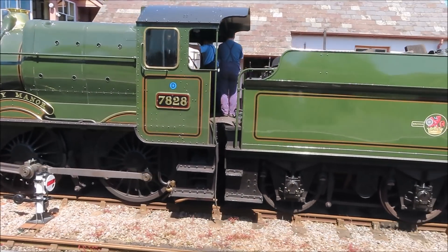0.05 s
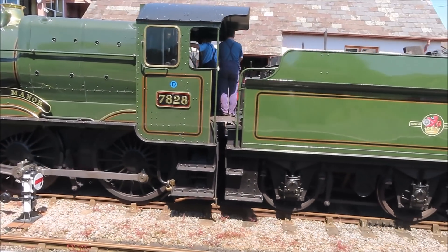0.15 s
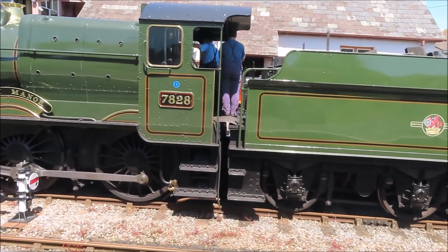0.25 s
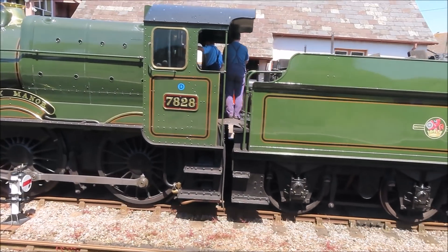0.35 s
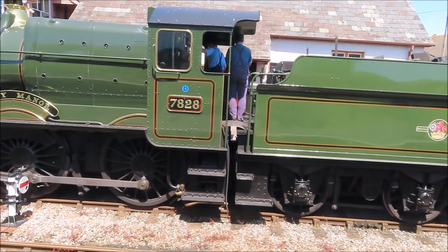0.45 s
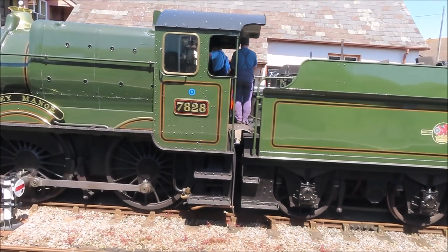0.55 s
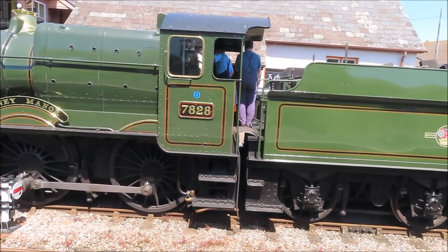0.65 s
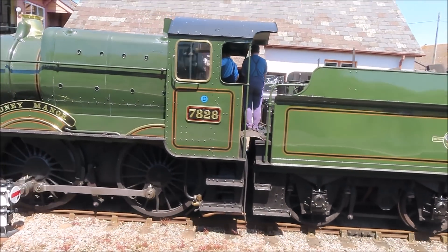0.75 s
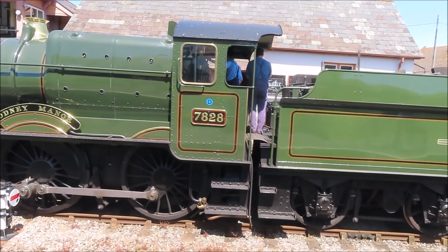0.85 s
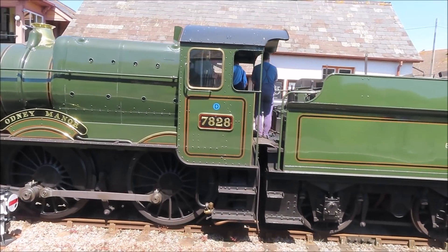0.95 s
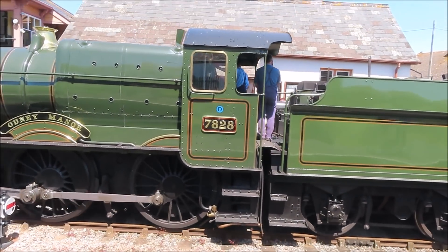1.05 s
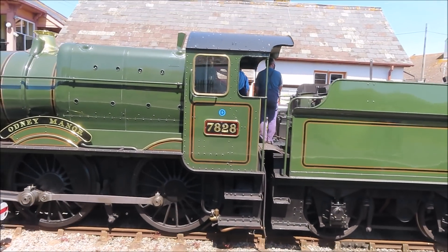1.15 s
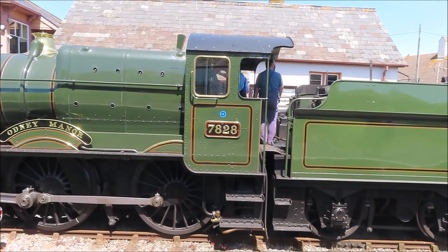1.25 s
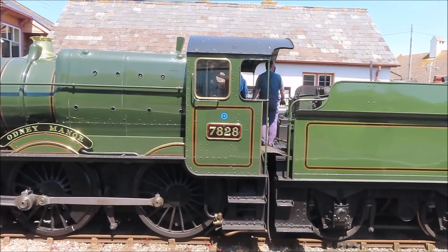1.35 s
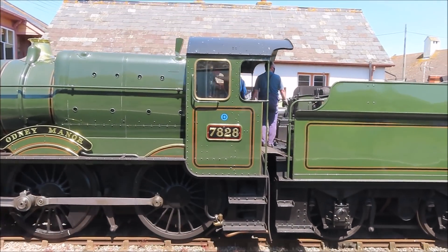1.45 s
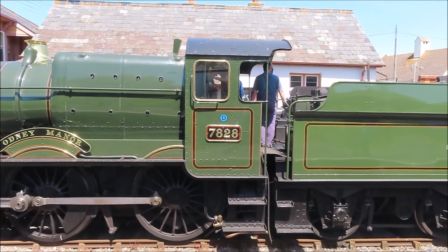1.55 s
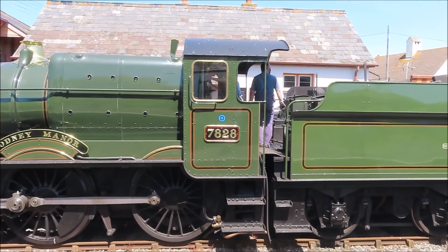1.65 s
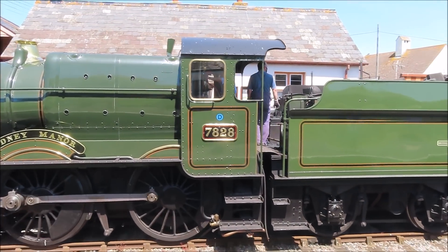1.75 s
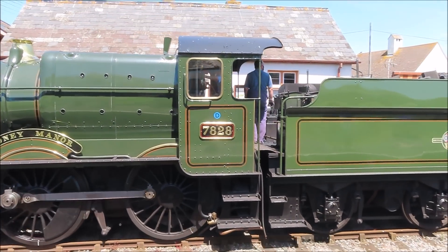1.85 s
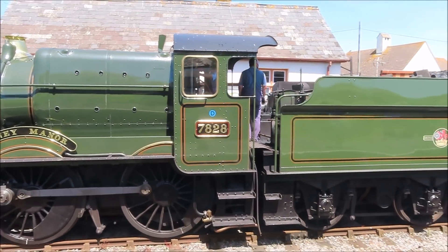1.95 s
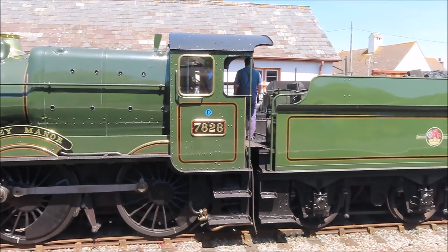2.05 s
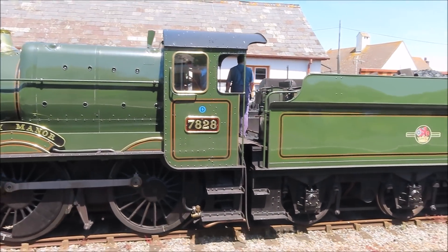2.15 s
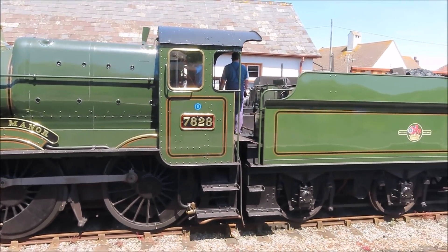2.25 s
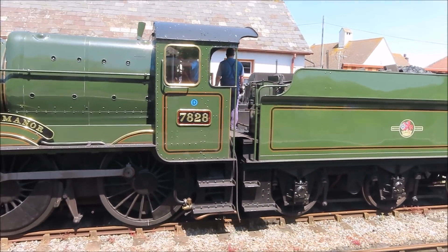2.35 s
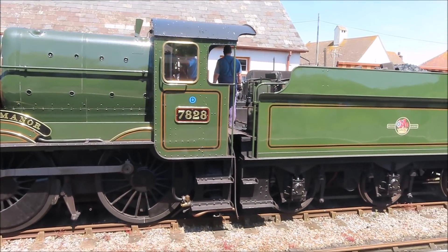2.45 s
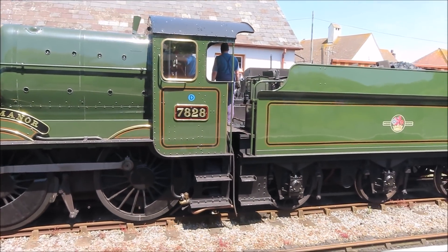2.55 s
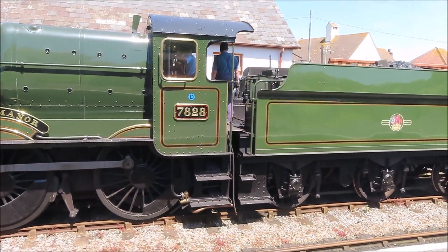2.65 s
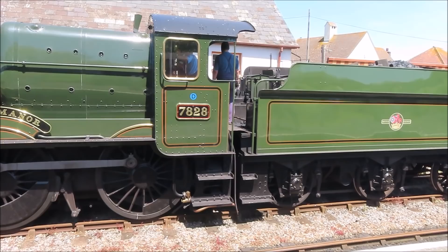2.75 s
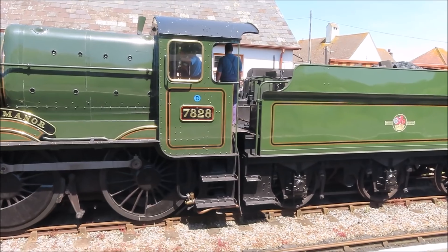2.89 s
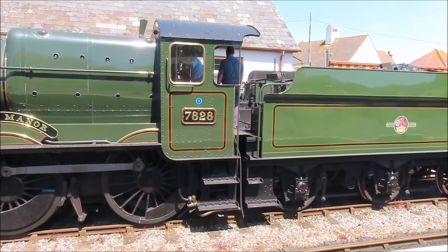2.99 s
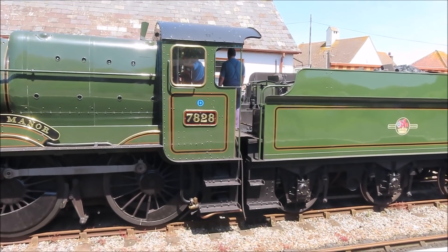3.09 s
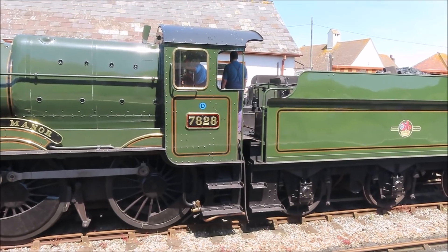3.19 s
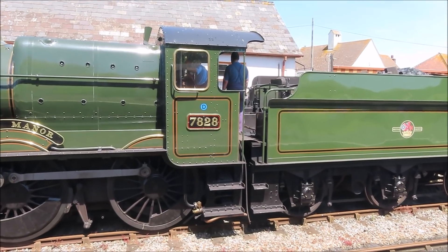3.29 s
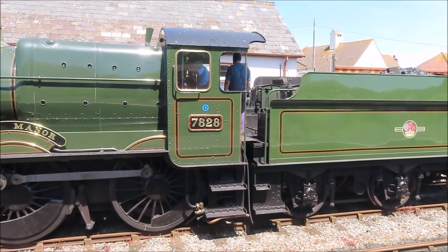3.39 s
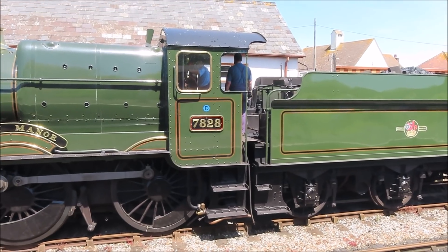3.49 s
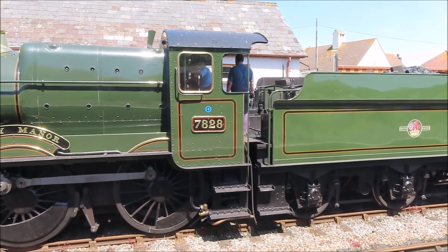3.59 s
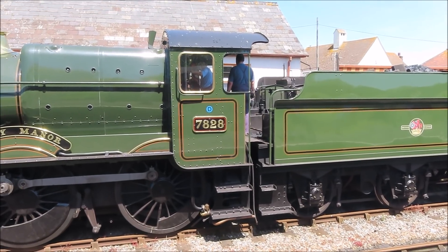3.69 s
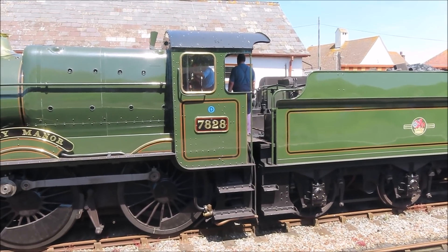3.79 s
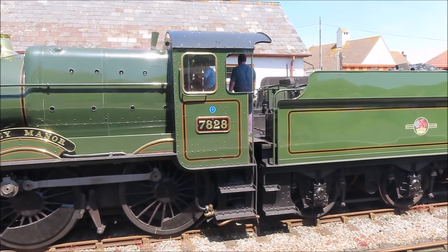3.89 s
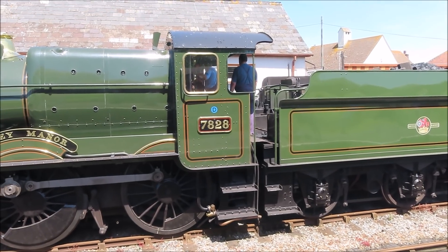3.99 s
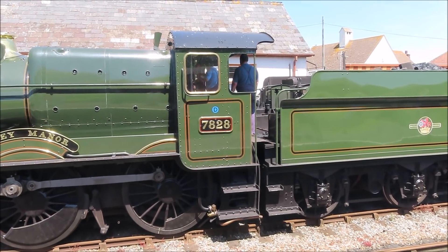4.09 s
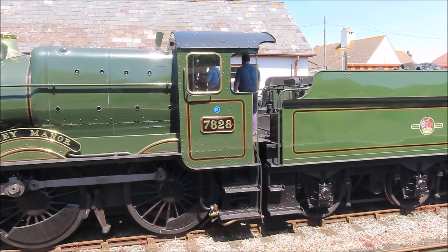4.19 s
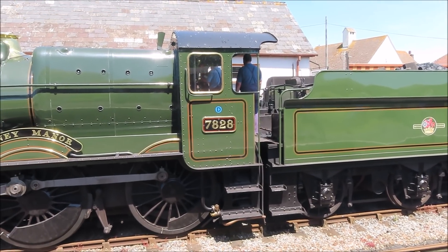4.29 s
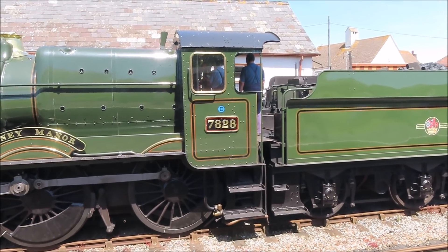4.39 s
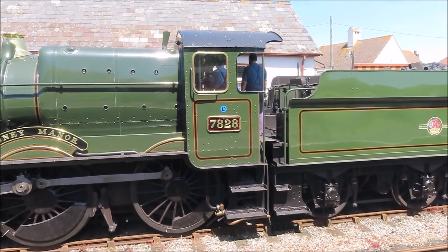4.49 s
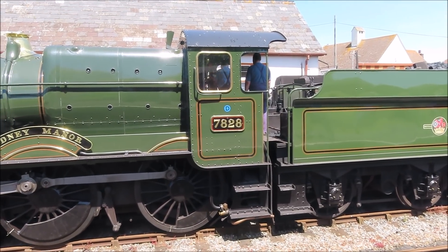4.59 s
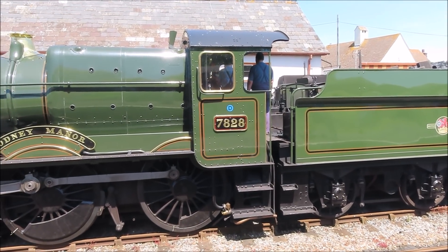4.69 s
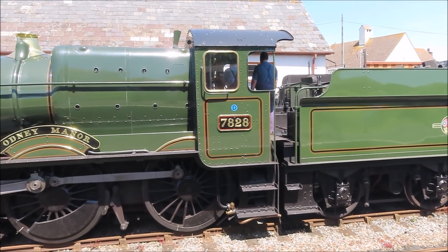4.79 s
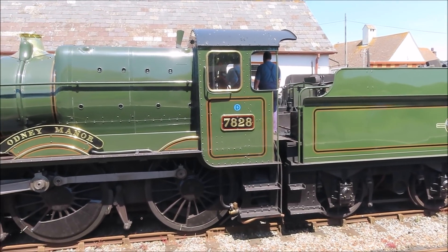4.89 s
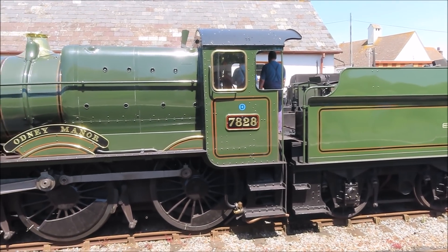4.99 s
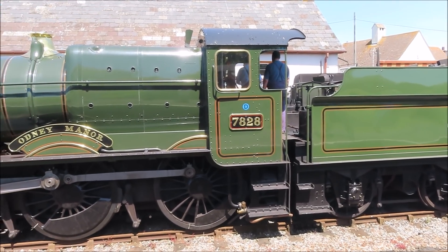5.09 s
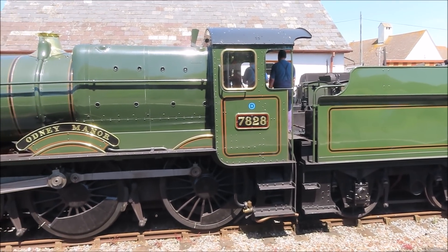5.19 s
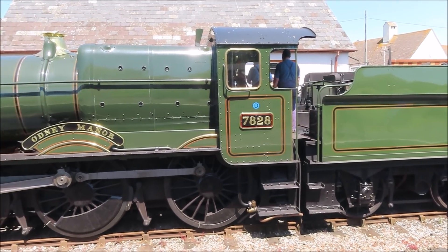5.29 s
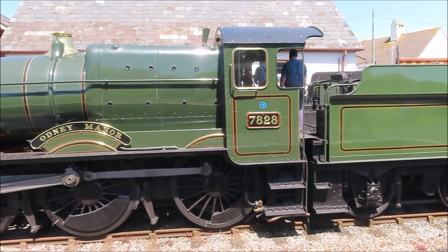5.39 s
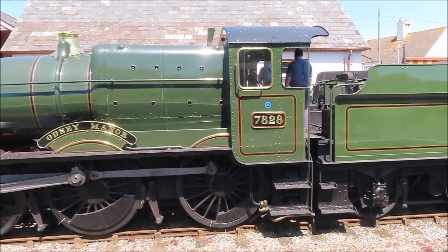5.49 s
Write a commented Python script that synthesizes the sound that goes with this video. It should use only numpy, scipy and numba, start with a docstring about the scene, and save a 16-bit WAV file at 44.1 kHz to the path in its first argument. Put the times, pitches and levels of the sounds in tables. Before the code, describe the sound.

Close outdoor stereo sound of a steam locomotive braking to a stand. Steady, slightly left-leaning steam hiss runs throughout over low rolling rumble, with a dry brake scrape in the first half second. Wheels thump over rail joints, strongest at 0.7 s, then duller around 1.2, 1.4, 1.75 and 2.05. From 1.15 s the brakes give tiny, thin, irregular chirps near 4.7 kHz, growing louder and denser. At 2.3 s couplings slam in a quick rattling iron clank with a short squeak, thud and clattering tail. Low groans and a nasal metallic moan follow. From about 2.97 to 3.3 s a pure, piercing shriek surges, rises slightly and breaks off. A soft low shudder marks the stop near 3.5 s. The loud moments briefly push the hiss down; afterwards it creeps back, fuller and harsher, over a faint deep drone from about 3.9 s until the end.

```python
"""Beside the track at a station, a few metres from a steam locomotive that brakes to a stand, hissing all the while.
Shaped noise makes the steam, the rolling and the shaking of the track; struck modes make the rail joints and couplings.
Friction tones make the brake shoes, which chirp near 4.7 kHz and then shriek, and the rigging, which groans and moans.
The stereo recorder's gain control ducks under loud sound, holds, and lets the hiss creep back."""
import sys
import numpy as np
from scipy import signal
from scipy.fft import rfft, irfft
from scipy.io import wavfile
from scipy.ndimage import uniform_filter1d
from numba import njit

SR = 44100
rng = np.random.default_rng(int(sys.argv[2]) if len(sys.argv) > 2 else 0)


def store_pcm(level_fs):
    """Save levels as 16-bit WAV."""
    pcm = np.round(np.clip(level_fs, -1, 1) * 32767).astype(np.int16)
    wavfile.write(sys.argv[1], SR, np.atleast_2d(pcm).T)


N = 244446
T = np.arange(N) / SR
FREQS = np.maximum(np.arange(N // 2 + 1) * SR / N, 1)  # Hz, kept above zero for the logarithms


def undb(db):
    """Decibels to gain."""
    return 10 ** (np.asarray(db) / 20)


def unit(x):
    """Scale to rms 1."""
    return x / np.sqrt(np.mean(np.abs(x) ** 2))


def colour(points):
    """Gain at every frequency from (Hz, dB) points, joined on a logarithmic frequency scale."""
    hz, db = np.transpose(points)
    return undb(np.interp(np.log(FREQS), np.log(hz), db))


def walk(rate, size=100):
    """Smooth chance of spread 1 that changes about rate times a second, drawn every size samples."""
    times = T[::size]
    hz = np.arange(len(times) // 2 + 1) * SR / size / len(times)
    lowpass = 1 / (1 + (hz / rate) ** 4)
    slow = irfft(rfft(rng.standard_normal(len(times))) * lowpass, len(times))
    return np.interp(T, times, unit(slow))


def ports(x, left_db):
    """Two microphone ports: the right hears later; left_db tilts the presence range to the left."""
    right_lag_s = 4.2e-5
    spectrum = rfft(x)
    tilt_db = left_db / 2 * FREQS / (FREQS + 600) / (1 + (FREQS / 8000) ** 4)
    late = np.exp(-2j * np.pi * FREQS * right_lag_s)
    left = spectrum * undb(tilt_db)
    right = spectrum * late * undb(-tilt_db)
    return irfft(np.array([left, right]), N)


def rush(shape, left_db, diffuse, flicker_db):
    """Turbulent noise of rms 1: each octave flickers alone, and scatter, mostly treble, differs between the ports."""
    direct = rfft(rng.standard_normal(N)) * shape
    flickering = 0
    for octave in np.arange(3, 15):  # centres at 2 ** octave Hz
        band = np.maximum(1 - np.abs(np.log2(FREQS) - octave), 0)
        flickering = flickering + irfft(direct * band, N) * undb(flicker_db * walk(21.6))
    scatter_gain = diffuse * (0.46 + FREQS / (FREQS + 1500))
    scatter = irfft(rfft(rng.standard_normal((2, N))) * shape * scatter_gain, N)
    return unit(ports(flickering, left_db) + scatter)


def stick_slip(hz, rough, flutter_hz, wander_hz, octave_db, third_db=-19, patchy_db=4.5):
    """A friction-driven mode: near a sine, fluttering in strength and phase, with weak overtones."""
    turn = np.exp(2j * np.pi * np.cumsum(hz + wander_hz * walk(23.8)) / SR)
    out = 0
    # the third partial lies third_db relative to the octave
    for k, db in enumerate((0, octave_db, octave_db + third_db)):
        flutter = 1 + rough * (walk(flutter_hz) + 1j * walk(flutter_hz))
        flutter = flutter / np.sqrt(1 + 2 * rough ** 2)
        # the overtones come and go as the contact changes
        patches_db = patchy_db * walk(25) if k else 0
        out = out + undb(db + patches_db) * (flutter * turn ** (k + 1)).imag
    return np.sqrt(2) * out


def fade(start, t60):
    """Silence, then an exponential decay from start; t60 is the time to fall 60 dB."""
    return (T >= start) * np.exp(-np.log(1000) * np.maximum(T - start, 0) / t60)


def swell(start, length, attack_s, t60):
    """Smooth attack, hold until length has passed, exponential release."""
    rise = np.sin(np.pi / 2 * np.clip((T - start) / attack_s, 0, 1)) ** 2
    return rise * np.exp(-np.log(1000) * np.maximum(T - start - length, 0) / t60)


def ring(start, hz, t60, push_s=0.0083):
    """One mode, pushed into motion by a heavy blow."""
    age = np.maximum(T - start, 0)
    pushed = 1 - np.exp(-age / push_s)
    return fade(start, t60) * pushed * np.sin(2 * np.pi * (hz * age + rng.random()))


def passing(closest_s, near_s):
    """Nearness 0-1 of a part of the engine that rolls past the microphone."""
    return 1 / (1 + ((T - closest_s) / near_s) ** 2)


def walls(x, t60):
    """Scatter from the engine's flank and the station: decaying noise, different at each port."""
    t = T[:SR // 2]
    response = rng.standard_normal((2, len(t))) * np.exp(-np.log(1000) * t / t60) * (t > .004)
    response /= np.sqrt(np.sum(response ** 2, axis=1, keepdims=True))
    return signal.fftconvolve(x[None], response, axes=1)[:, :N]


def steam(surge_db=0.5):
    """A jet coloured by its outlet, which rolls past and later opens; late on, the boiler drones low."""
    # noise spectrum of the jet: pitch_hz, density_db (relative, per Hz)
    jet_spectrum = [(30, -4), (90, 0), (170, 1), (370, -2.5), (490, -11.5), (600, -6.5), (750, -3),
                    (1000, -3), (2200, -0.4), (3200, 0), (4400, 0.5), (6000, 2), (8000, -2.5),
                    (12000, -3.5), (15000, -20)]
    # resonances of the outlet between the frames, and notches from the ground: centre_hz, width_hz, lift_db
    outlet_modes = [(249, 3.4, -7), (701, 32, 6.5), (808, 50, 7.5), (956, 39, -6.5), (1227, 60, 6),
                    (1450, 220, -2.5), (2813, 46, -17), (3130, 100, -3), (3500, 140, -2), (3760, 160, 0.5),
                    (3850, 170, -1.5), (4280, 44, 3)]
    lift_db = sum(db / (1 + (2 * (FREQS - hz) / width) ** 2) for hz, width, db in outlet_modes)
    jet = rush(colour(jet_spectrum) * undb(lift_db), left_db=3.5, diffuse=0.47, flicker_db=1.47)
    # the jet gains 5 dB over 2.46 s, from 1.47 s on
    flow_db = -19.5 + 5 * np.clip((T - 1.47) / 2.46, 0, 1) + surge_db * walk(0.52)
    near_db = 1.5 * passing(closest_s=0.98, near_s=0.26)
    drone = undb(-32) * swell(3.84, length=0.8, attack_s=0.19, t60=3.6)
    drone *= stick_slip(55.6, rough=0.5, flutter_hz=7.6, wander_hz=0.89, octave_db=-11)
    return jet * undb(flow_db + near_db) + ports(drone, left_db=-7)


def wheels(knock_db=-15, knock_t60=0.1):
    """Rolling settles just before the stop, track shaking follows speed; joints ring the wheel, then the frame."""
    # wheels over rail joints, the farther ones duller:
    # start_s, level_db (relative), dullness_db (per octave above the frame's note)
    joints = [(.701, -2, 0), (1.162, -14.5, 4), (1.385, -7.5, 8.5), (1.746, -14, 0.5), (2.045, -13.5, 0)]
    # what a joint sets ringing, wheel first and frame last: delay_s, pitch_hz, level_db (relative), t60_s
    thump_modes = [(0, 253, 5, 0.062), (0, 332, -7, 0.068), (0.018, 120, -9, 0.058), (0.035, 102, -2, 0.19),
                   (0.05, 62, -8.5, 0.13)]
    # spectra of rolling, shaking track and scraping shoe: pitch_hz, density_db (relative, per Hz)
    rumble_spectrum = [(40, -30), (70, -33), (110, 1), (160, 0), (260, -4), (400, -9), (520, -11.5),
                       (780, -9.5), (1050, -17), (2200, -23.5), (5000, -47), (15000, -52)]
    track_spectrum = [(15, -14), (28, -10), (45, 6), (65, -3), (100, 8), (135, -7), (300, -44)]
    shoe_spectrum = [(400, -18), (800, -28), (1300, 2), (1900, 3.5), (2060, 7.5), (2180, 8), (2280, -7),
                     (2450, 0), (2800, 3), (3500, -5), (5000, -13), (9000, -6), (15000, -35)]
    stop_s, settle_s = 3.5, 0.32
    frame_hz = 100

    speed = np.maximum(1 - T / stop_s, 0)  # share of the first speed: the wheels slow evenly
    # the tender's leading axle draws near and passes
    near_db = 4 * passing(closest_s=1.84, near_s=1)
    rolling = undb(-26.5 + near_db) * np.clip((stop_s - T) / settle_s, 0, 1) ** 2
    # the frame shudders once as the wheels stop
    shudder = undb(-16) * swell(3.49, length=0.083, attack_s=0.043, t60=0.59)
    knocks = sum(undb(db + knock_db) * fade(s, knock_t60) for s, db, _ in joints)
    rumble = rush(colour(rumble_spectrum), left_db=0.0, diffuse=0.36, flicker_db=0)
    out = (rolling + shudder + knocks) * rumble

    # the frame rumbles on just after each joint
    jolt_lag_s, jolt_rise_s, jolt_db, jolt_t60 = 0.0089, 0.024, -15, .25
    jolts = sum(undb(db + jolt_db) * swell(s + jolt_lag_s, jolt_rise_s, jolt_rise_s, jolt_t60)
                for s, db, _ in joints)
    shaking = undb(-29 + near_db) * speed ** 0.18
    out += (shaking + jolts) * rush(colour(track_spectrum), left_db=4.0, diffuse=0.26, flicker_db=1.5)

    # a shoe scrapes dryly at first
    scrape = undb(-22.5) * swell(0, length=0.33, attack_s=0.13, t60=0.25)
    out += scrape * rush(colour(shoe_spectrum), left_db=-1.0, diffuse=0.11, flicker_db=2.5)

    thumps = sum(undb(db + mode_db - dull * np.log2(hz / frame_hz)) * ring(s + lag, hz, t60)
                 for s, db, dull in joints for lag, hz, mode_db, t60 in thump_modes)
    return out + ports(thumps, left_db=0.5)


def singing():
    """Faint, uneven ringing of the shoes between the chirps, growing with the brake's bite."""
    start_s, bite_db_per_s = 1, 10
    bite_db = bite_db_per_s * (T - start_s)
    gain = undb(-24.5 + bite_db) * swell(start_s, length=1.82, attack_s=0.21, t60=0.96)
    return gain * stick_slip(4760, rough=1.2, flutter_hz=72, wander_hz=21.05, octave_db=-11.5)


def catch(start, length, attack_s, release_s=0.029):
    """A shoe's grip: a rounded rise, a hold, and a rounded letting go."""
    edges = np.clip([(T - start) / attack_s, 1 - (T - start - length) / release_s], 0, 1)
    return np.sin(np.pi / 2 * edges.min(axis=0)) ** 2


def chirps():
    """The shoe catches and lets go; every catch is a thin tone that glides through its own pitch."""
    # catches of the shoe: start_s, length_s, attack_s, pitch_hz, glide_hz_per_s,
    # level_db (relative), octave_db (below the main tone)
    catches = [(1.156, 0.014, .01, 4735, -2, -14, -21), (1.226, .016, .012, 4730, 0, -16, -19),
               (1.256, .013, 0.011, 4800, 0, -17, -13), (1.29, 0.016, 0.017, 4710, 0, -15, -20),
               (1.362, 0.03, 0.031, 4727, -400, -1, -23), (1.407, 0.039, 0.019, 4595, -200, -5.5, -30),
               (1.463, 0.013, 0.013, 4700, 0, -8, -10), (1.554, .019, .017, 4780, 0, -15.5, -20),
               (1.664, 0.024, 0.029, 4750, 3.5, -10.5, -26), (1.713, 0.014, 0.011, 4783, 0, -14, -24),
               (1.738, 0.022, 0.017, 4730, -1.5, -4, -5.5), (1.772, 0.058, .015, 4755, -200, -8.5, -18),
               (1.851, 0.016, 0.015, 4755, 0, -8, -5), (1.891, 0.085, 0.015, 4678, -250, -4.5, -13),
               (2.036, 0.019, 0.015, 4752, 0, -3, -9), (2.076, 0.086, .02, 4725, -500, 2, -13),
               (2.197, 0.022, 0.022, 4745, -400, -4.5, -11.5), (2.235, 0.018, 0.022, 4700, 0, -0.5, -22),
               (2.34, 0.015, 0.0099, 4750, 0, 2.5, -28), (2.369, 0.025, .012, 4748, -500, -5.5, -20),
               (2.415, 0.015, 0.019, 4700, 400, 3, -10), (2.445, 0.031, 0.016, 4735, -200, 13.5, -15.5),
               (2.495, 0.069, 0.017, 4748, 400, 5, -19), (2.573, 0.015, 0.011, 4790, 500, -2, -6),
               (2.622, 0.031, 0.016, 4712, 0, -1, -8), (2.673, 0.043, 0.022, 4725, 0, -0.5, -2),
               (2.717, 0.025, 0.022, 4735, 200, 7.5, -10.5), (2.761, 0.05, .025, 4760, -600, 2, -7),
               (2.839, .043, .04, 4715, -100, 9.5, -11.5)]
    starts, lengths, _, hz, glide, levels, octave_db = np.transpose(catches)
    gain = np.max([undb(db) * catch(s, length, attack_s)
                   for s, length, attack_s, _, _, db, _ in catches], axis=0)
    # each catch keeps its settings until the next one takes over
    now = np.maximum(np.searchsorted(starts, T) - 1, 0)
    bend = glide[now] * (np.clip(T - starts[now], 0, lengths[now]) - lengths[now] / 2)
    hz = uniform_filter1d(hz[now] + bend, size=500)
    octave_db = uniform_filter1d(octave_db[now], size=500)
    # weak catches flutter, firm ones ring cleanly
    rough = np.maximum(.16 - .01 * uniform_filter1d(levels[now], size=500), 0)
    return gain * stick_slip(hz, rough, flutter_hz=70, wander_hz=4.15, octave_db=octave_db)


def vent():
    """A second, harsher jet of steam swells as it comes round the engine, then eases a little."""
    # noise spectrum of the second jet: pitch_hz, density_db (relative, per Hz)
    vent_spectrum = [(40, -14), (100, -0.5), (160, 3.5), (350, 0.5), (520, -7.5), (900, -5.5), (2000, -3),
                     (3000, -0.5), (4500, 2), (6000, -4.5), (9000, -4.5), (15000, -16)]
    flow = undb(-19.5) * swell(1.45, length=3.6, attack_s=1.62, t60=4.4)
    return flow * rush(colour(vent_spectrum), left_db=5.0, diffuse=0.63, flicker_db=1.8)


def groans():
    """Low friction tones of the rigging whose pitch sags as their swing grows."""
    # groans: start_s, length_s, attack_s, t60_s, pitch_hz (at full swing), level_db (relative),
    # roughness (0-1), octave_db (below the main tone)
    groan_table = [(1.527, 0.098, 0.045, .15, 795, -29.5, .5, -23),
                   (1.815, 0.076, 0.031, .15, 770, -29, .5, -25),
                   (2.47, 0.52, 0.1, 1.0, 120.9, -22, 0.57, -16),
                   (2.845, 0.088, 0.047, 0.33, 818, -24, 0.5, -27),
                   (3.15, 0.057, 0.042, 0.18, 1770, -22.5, 0.4, -31),
                   (3.219, 0.17, .1, .25, 125.4, -27.5, 0, -24)]
    sag = .02  # share by which a groan starts sharp
    out = 0
    for s, length, attack_s, t60, hz, db, rough, octave_db in groan_table:
        swing = swell(s, length, attack_s, t60)
        pitch = hz * (1 + sag * (1 - swing))
        tone = stick_slip(pitch, rough, flutter_hz=24.8, wander_hz=1.968, octave_db=octave_db)
        out = out + undb(db) * swing * tone
    return out


def shriek(waver_db=0.5):
    """One shoe locks into a clean, surging tone that rises as it dies; other shoes ring softly near its pitch,
    some before it and some beating with it."""
    # course of the shriek: time_s, pitch_hz, level_db (relative)
    course = [(2.983, 4765, 11), (3.004, 4777, 7), (3.033, 4760, 12), (3.072, 4797, 6), (3.105, 4765, 14.5),
              (3.16, 4758, 13), (3.209, 4804, 7.5), (3.251, 4850, 11), (3.28, 4897, -6.5),
              (3.32, 4920, 1.5), (3.355, 4930, -20), (3.383, 4890, -6), (3.405, 4900, -25),
              (3.45, 4850, -14)]
    # other shoes near its pitch: start_s, length_s, pitch_hz, level_db (relative)
    other_shoes = [(1.885, 0.075, 4770, -16), (2.19, 0.055, 4805, -12), (2.71, .075, 4827, -3),
                   (3.047, 0.045, 4590, -6), (3.14, 0.304, 4625, -10.5), (3.12, 0.13, 4700, -5.5),
                   (3.27, 0.053, 4700, -10)]
    start_s = 2.971
    times, pitch, db = np.transpose(course)
    gain = undb(np.interp(T, times, db) + waver_db * walk(40))
    gain = gain * swell(start_s, times[-1] - start_s, attack_s=0.0093, t60=0.25)
    hz = np.interp(T, times, pitch)
    out = gain * stick_slip(hz, rough=0.05, flutter_hz=61, wander_hz=4.2, octave_db=-24)
    for s, length, hz, db in other_shoes:
        ringing = undb(db) * swell(s, length, attack_s=0.042, t60=0.2)
        out = out + ringing * stick_slip(hz, rough=0.36, flutter_hz=23, wander_hz=1.57, octave_db=-18)
    return out


def moan(curve, attack_s=.03, t60=0.3):
    """A friction tone that bends with the load on the iron."""
    times, hz, db = np.transpose(curve)
    gain = undb(np.interp(T, times, db)) * swell(times[0], times[-1] - times[0], attack_s, t60)
    pitch = np.interp(T, times, hz)
    return gain * stick_slip(pitch, rough=0.26, flutter_hz=25, wander_hz=1.5, octave_db=-24.0)


def brakes(squeal_db=-3.0, groan_db=2.0):
    """High squeals of shoes on tyres, a little to the left, over the lower groans of the rigging."""
    # the rigging's moan and a brief higher whine: time_s, pitch_hz, level_db (relative)
    moan_curve = [(2.41, 794.7, -32), (2.452, 785, -20.5), (2.51, 759, -20), (2.6, 770, -19.5),
                  (2.7, 751.5, -21), (2.86, 773, -26), (3.03, 779, -26), (3.23, 768, -16.5),
                  (3.35, 762, -17.5), (3.48, 778, -25.5)]
    whine_curve = [(2.93, 906, -36), (3.01, 885, -31), (3.05, 876, -16.5), (3.09, 864, -23.5),
                   (3.12, 869, -24), (3.17, 886, -24), (3.21, 892, -36)]
    squeal = chirps() + singing() + shriek()
    direct = ports(squeal, left_db=3.2)
    scatter = undb(-18) * walls(squeal, t60=.2)
    rigging = ports(groans() + moan(moan_curve) + moan(whine_curve), left_db=-2.5)
    return undb(squeal_db) * direct + scatter + undb(groan_db) * rigging


def couplings(ring_db=0.0, crash_db=-7, crash_t60=0.21, crack_db=-9.5, crack_t60=0.085, tail_db=-22, tail_t60=0.98):
    """Blows crack and ring the iron, each at its own spot; frames thud, loose parts crash, station walls answer."""
    # the couplings close up in a quick rattle: start_s, level_db (relative)
    clanks = [(2.306, -2), (2.315, -2.5), (2.329, -8), (2.348, -10.5), (2.372, -18), (2.42, -21)]
    # modes of the iron, before each blow varies them: pitch_hz, level_db (relative), t60_s
    iron_modes = [(382, -22, 0.2), (521, 1.5, 0.1), (614.5, -6, 0.2), (724, -2.5, 0.099),
                  (855, -11.5, 0.16), (1049, -1.5, 0.077), (1120, -7, 0.17), (1750, -20, 0.2),
                  (1820, -23, 0.2), (2435, -12.5, 0.069), (2700, -16, 0.11)]
    # iron slides on iron in one quick squeak: time_s, pitch_hz, level_db (relative)
    squeak_curve = [(2.306, 2500, -14), (2.313, 3306, -16), (2.319, 3620, -14.5), (2.327, 2750, -15),
                    (2.336, 2200, -15), (2.35, 1900, -30)]
    # spectra of the crack, loose parts and thudding frames: pitch_hz, density_db (relative, per Hz)
    crack_spectrum = [(200, -22), (600, 3), (1150, -4), (1500, -5), (2000, 1), (3500, 0), (4400, -20),
                      (15000, -49)]
    crash_spectrum = [(60, -26), (170, -17), (330, -3), (600, 3), (1100, -4.5), (1500, -9.5), (2500, -19.5),
                      (4500, -21), (15000, -51)]
    thud_spectrum = [(60, -29), (130, -5.5), (260, 1.5), (400, -2), (650, -10), (1200, -30), (15000, -75)]

    rings = 0
    spots = rng.standard_normal((len(clanks), len(iron_modes)))
    for (s, db), spot in zip(clanks, spots):
        for (hz, mode_db, t60), c in zip(iron_modes, spot):
            gain = undb(db + mode_db + 1.4 * c)
            rings = rings + gain * ring(s, hz * (1 + 0.01203 * c), t60, push_s=0.0016)

    def blows(t60):
        """Fading level of all blows, their powers added."""
        return np.sqrt(sum((undb(db) * fade(s, t60)) ** 2 for s, db in clanks))

    crack = undb(crack_db) * blows(crack_t60)
    crack = crack * rush(colour(crack_spectrum), left_db=0, diffuse=0.22, flicker_db=1.5)
    # the heavy frames thud 7.3 ms after the couplings meet
    heave = undb(-8) * swell(clanks[0][0] + 0.0073, length=0.033, attack_s=0.0083, t60=0.49)
    thud = heave * rush(colour(thud_spectrum), left_db=-1.0, diffuse=0.13, flicker_db=0.5)
    # loose parts, then the longer, fainter tail from the walls
    loose = undb(crash_db) * blows(crash_t60) + undb(tail_db) * blows(tail_t60)
    crash = loose * rush(colour(crash_spectrum), left_db=-1.0, diffuse=0.14, flicker_db=3.5)
    squeak = moan(squeak_curve, attack_s=.004, t60=.05)
    return ports(undb(ring_db) * rings + squeak, left_db=0.0) + crack + thud + crash


def scene():
    """The whole engine at the two ports."""
    return steam() + vent() + wheels() + brakes() + couplings()


@njit
def duck(over_db, attack_s, hold_s, release_db_per_s):
    """Gain reduction in dB: grows quickly while the sound is too loud, holds, then creeps back."""
    out, cut, idle = np.empty(len(over_db)), 0., 0.
    for i in range(len(over_db)):
        idle += 1 / SR
        if over_db[i] > cut:
            cut += (over_db[i] - cut) / (attack_s * SR)
            idle = 0.
        elif idle > hold_s:
            cut = max(cut - release_db_per_s / SR, 0.)
        out[i] = cut
    return out


def record(dry, ceiling_db=-12):
    """Automatic gain control on the level of both channels, rounded peaks, then the recorder's top cut."""
    power = uniform_filter1d(np.mean(dry ** 2, axis=0), size=220)  # averaged over 5 ms
    over_db = 10 * np.log10(np.abs(power) + 1e-12) - ceiling_db
    cut_db = duck(over_db, attack_s=0.043, hold_s=0.28, release_db_per_s=7.0)
    held = dry * undb(-cut_db)
    rounded = held / (1 + (held / .82) ** 4) ** .25
    top_cut = signal.ellip(8, .2, 80, 14700, fs=SR, output="sos")  # low-pass at 14.7 kHz
    return signal.sosfilt(top_cut, rounded)


dry = scene()
out = record(dry)
store_pcm(out)
```